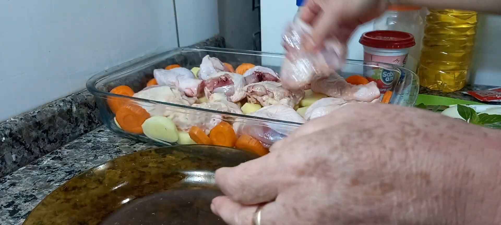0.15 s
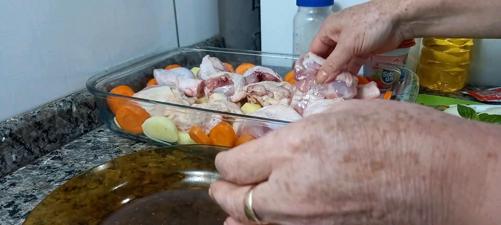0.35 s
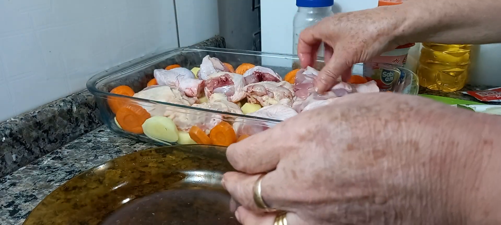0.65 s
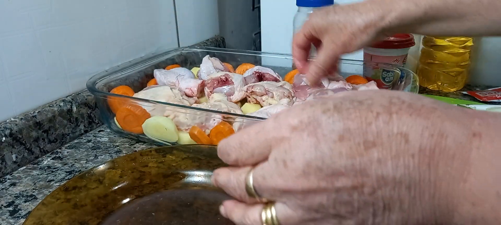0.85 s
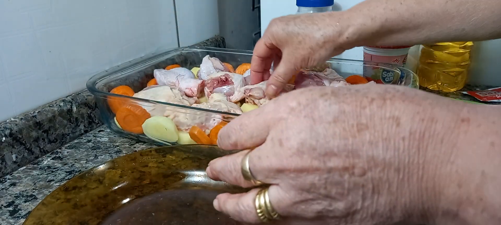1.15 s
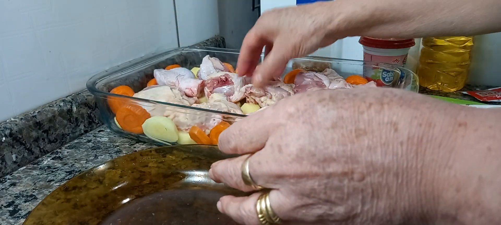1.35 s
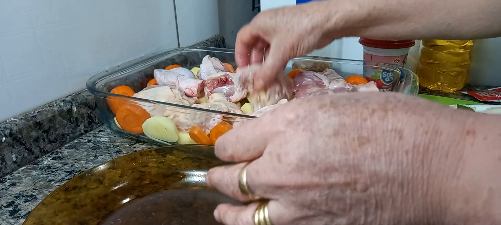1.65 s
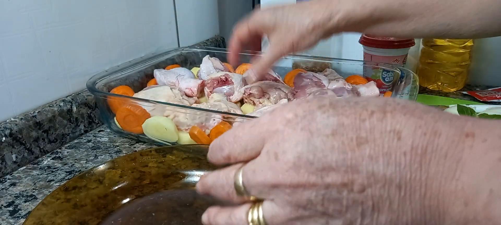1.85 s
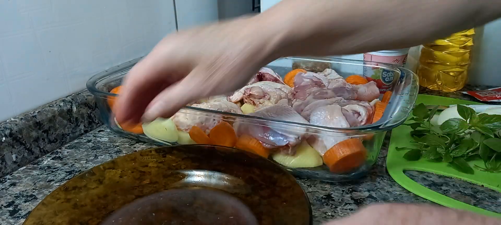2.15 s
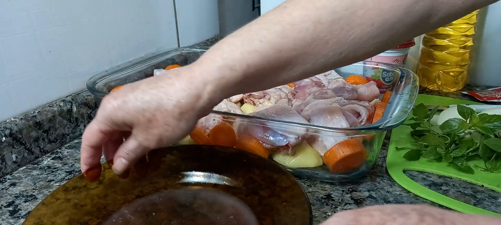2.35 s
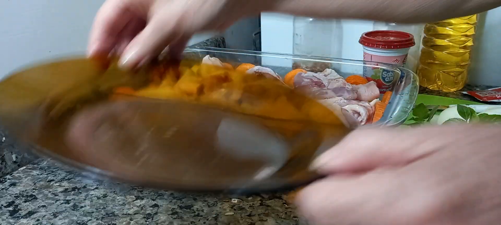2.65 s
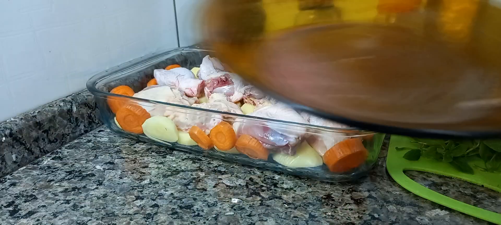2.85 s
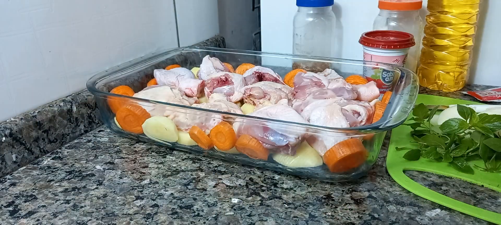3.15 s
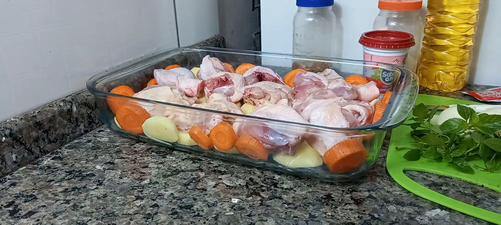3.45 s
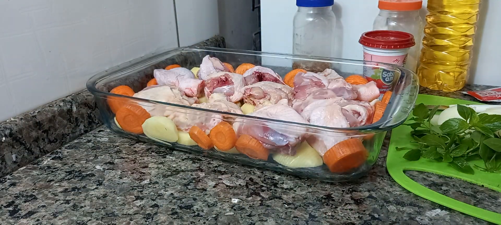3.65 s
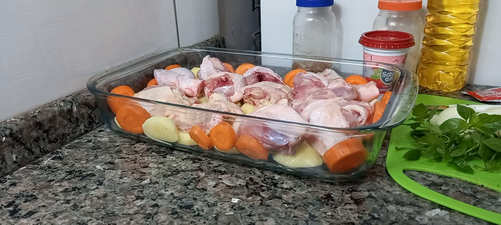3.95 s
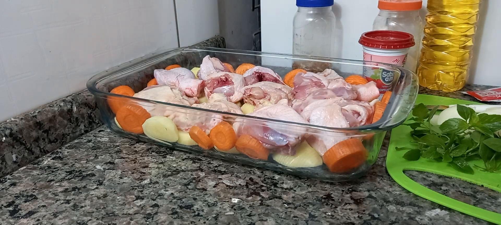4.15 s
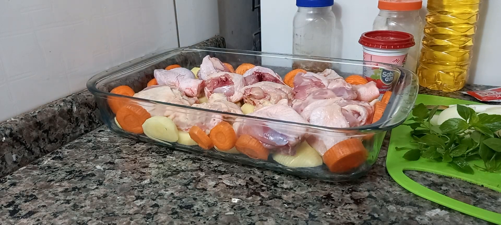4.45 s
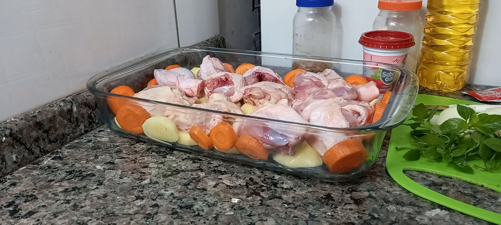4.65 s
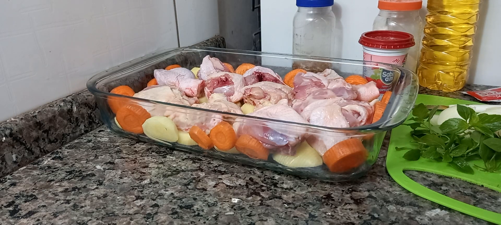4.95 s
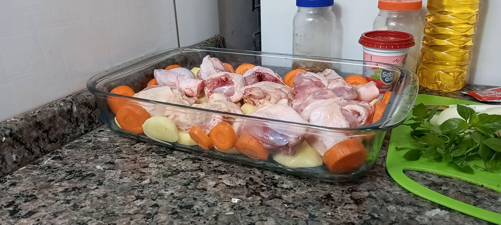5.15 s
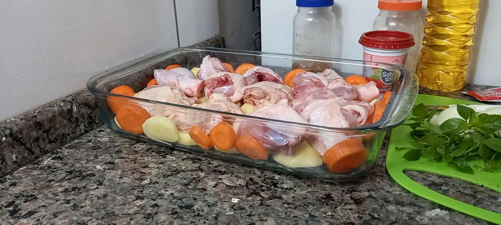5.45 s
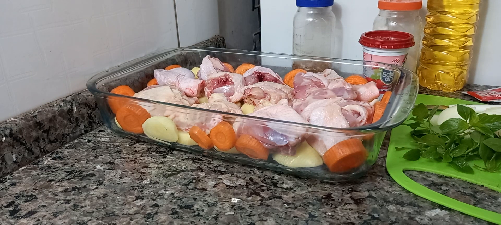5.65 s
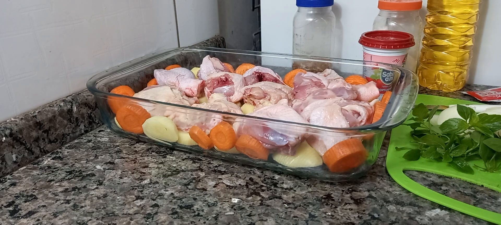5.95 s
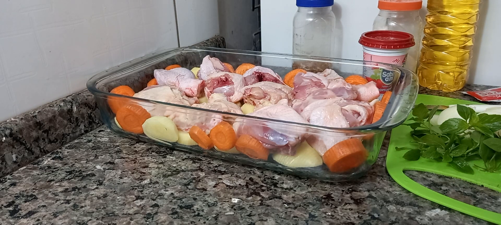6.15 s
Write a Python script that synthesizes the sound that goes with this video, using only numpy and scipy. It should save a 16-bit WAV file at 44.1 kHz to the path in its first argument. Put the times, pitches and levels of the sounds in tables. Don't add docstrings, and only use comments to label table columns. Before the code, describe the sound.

In a small kitchen, a dish knocks dully on the counter, a glass plate clatters loudly into a sink, then a tap sputters on.

```python
import sys
import numpy as np
from scipy import signal
from scipy.fft import rfft, irfft, next_fast_len
from scipy.io import wavfile
from scipy.ndimage import uniform_filter1d

SR = 44100
rng = np.random.default_rng(int(sys.argv[2]) if len(sys.argv) > 2 else 0)


def store_wav(level_fs):
    pcm = np.round(np.clip(np.atleast_2d(level_fs), -1, 1) * 32767)
    wavfile.write(sys.argv[1], SR, pcm.T.astype(np.int16))


def invert_db(x):
    u = np.asarray(x, float) / 20
    return 10 ** u


N = 278261


def coloured(points, size):
    hz, db = np.transpose(points)
    bins_hz = np.fft.rfftfreq(size, 1 / SR) + 1
    gain = invert_db(np.interp(np.log(bins_hz), np.log(hz), db))
    return unit(irfft(rfft(rng.standard_normal(size)) * gain, size))


def filtered(x, order, hz, kind):
    return signal.sosfilt(signal.butter(order, hz, kind, fs=SR, output="sos"), x)


def band(x, lo_hz, hi_hz):
    return filtered(x, 2, [lo_hz, min(hi_hz, .45 * SR)], "band")


def unit(x):
    return x / x.std()


def band_noise(size, lo_hz, hi_hz):
    return band(rng.standard_normal(size), lo_hz, hi_hz)


def walk(rate_hz):
    hold = int(SR / rate_hz)
    steps = np.repeat(rng.standard_normal(N // hold + 1), hold)
    return 1.3 * uniform_filter1d(uniform_filter1d(steps, hold), hold)[:N]


def columns(table):
    s, db, *rest = np.transpose(table)
    t = np.arange(N) / SR
    level_db = np.interp(t, s, db, left=-150, right=-150)
    return [level_db] + [np.interp(t, s, c) for c in rest]


def add(out, s, x, pan_db):
    i = int(s * SR)
    x = x[..., :N - i]
    out[:, i:i + x.shape[-1]] += x * invert_db(np.array([[pan_db], [-pan_db]]) / 2)


def pair(make, alike):
    share = np.clip(alike, 0, 1)
    mid = make() * np.sqrt(1 + share)
    side = filtered(make() * np.sqrt(1 - share), 1, 300, "high")
    return np.array([mid + side, mid - side]) / np.sqrt(2)


def blows(events, modes, crack, ring_s, crack_s, crack_db, scatter_db, rise_s):
    out, t = np.zeros((2, N)), np.arange(SR // 3) / SR
    hz, db, t60_s = np.transpose(modes)[:, :, None]
    beat_hz = .006 * hz * rng.random(hz.shape)
    beat = 1 + 0.7 * np.cos(2 * np.pi * beat_hz * t)
    lead = np.array([1, -1])[:, None, None] * np.clip(hz / 7000, 0, .6) * rng.standard_normal(hz.shape)
    for s, peak_db, bright_db, *pan_db in events:
        level_chance, pitch_chance = rng.standard_normal((2, len(modes), 1))
        decay = invert_db(db + scatter_db * level_chance - 60 * t / np.minimum(t60_s, ring_s))
        phase = 2 * np.pi * hz * (1 + 0.0024 * pitch_chance) * t + lead
        ring = np.sum(decay * np.sin(phase) * beat, axis=1)
        burst = invert_db(crack_db - 60 * t / crack_s) * pair(lambda: coloured(crack, len(t)), 0.1)
        x = ring / ring[:, :400].std() + burst
        low, high = filtered(x, 2, 3000, "low"), filtered(x, 2, 3000, "high")
        x = low / low[:, :400].std() - invert_db(bright_db) * high / high[:, :400].std()
        add(out, s, invert_db(peak_db) * x * np.clip(t / rise_s, 0, 1), sum(pan_db))
    return out


# f/Hz, t60/s
ROOM_T60 = [(200, 0.5), (1000, 0.42), (4000, 0.44), (12000, 0.3)]


def kitchen(dry, wet_db):
    t = np.arange(SR * 3 // 4) / SR
    hz, t60_s = np.transpose(ROOM_T60)
    tails = 0
    for f in 63 * 2. ** np.arange(9):
        octave = pair(lambda: band_noise(len(t), f / np.sqrt(2), f * np.sqrt(2)), 1 - f / 900)
        tails = tails + octave * invert_db(-60 * t / np.interp(np.log(f), np.log(hz), t60_s))
    tails = tails * np.clip(t / 0.0081, 0, 1)
    tails = tails / np.sqrt(np.sum(tails ** 2) / 2)
    return dry + invert_db(wet_db) * signal.fftconvolve(dry.mean(0, keepdims=True), tails, axes=1)[:, :N]


# f/Hz, level/dB per Hz
TONE = [(15, -39), (25, -43.5), (44, -15.5), (120, -11), (161, -14.5), (175, -11), (242, -5), (394, -16),
        (489, -22.5), (560, -28.5), (1330, -45.5), (1520, -49), (6740, -52.5), (7510, -60.5), (16000, -67)]
TONE_DB = -46
# f/Hz, width/Hz, level/dB
BOOM = [(64.94, 3.9, -63.5), (115.3, 25, -56.5), (244.7, 30.2, -47.5), (326, 64, -61.5), (486.3, 59, -67.5),
        (6500, 770, -73.5)]
# f/Hz, level/dB rms
HUM = [(59, -69), (188.4, -55)]
# f/Hz, width/Hz, level/dB rms
WHINES = [(5520, 60, -81), (8740, 50, -89.5), (13103, 60, -92)]
# t/s, level/dB
SWELL = [(0.0, -47.5), (0.37, -53), (0.86, -46), (1.9, -56.5), (2.2, -50), (4.09, -46.5), (4.24, -48.5),
         (4.88, -54.5), (5.45, -50.5), (5.68, -51), (6.17, -49), (6.31, -48.5)]


def room_tone():
    t = np.arange(N) / SR
    size = next_fast_len(N)
    mid = coloured(TONE, size)[:N]
    side = filtered(coloured(TONE, size)[:N], 2, 450, "high")
    out = invert_db(TONE_DB - 5.5) * np.array([mid + 0.7 * side, mid - 1.21 * side])
    swell_db = columns(SWELL)[0]
    for hz, width, db in BOOM:
        drive = np.exp(-np.log2(hz / BOOM[2][0]) ** 2)
        lift_db = (swell_db - swell_db.mean()) * drive + 2.58 * walk(3.315) * (hz < 1000)
        ring = pair(lambda: unit(band_noise(N, hz - width / 2, hz + width / 2)), 1 - hz / 900)
        out = out + invert_db(db + lift_db) * ring
    for hz, width, db in WHINES:
        rough = pair(lambda: unit(band_noise(N, hz - width / 2, hz + width / 2)), .3)
        out = out + invert_db(db) * (np.sin(2 * np.pi * hz * t) + .6 * rough)
    for hz, db in HUM:
        line = np.sqrt(2) * np.sin(2 * np.pi * hz * t + 0.17 * walk(26))
        out = out + invert_db(db + walk(11.0)) * line
    return out


# f/Hz, level/dB
SCUFF_COLOUR = [(290, -46), (500, 3.5), (561, -11.5), (726, -6), (1270, -9), (2260, -11), (3100, -13.5),
                (5200, -9.5), (6400, -2.5), (8120, -8.5), (12000, -20), (15500, -27)]
# loudest t/s, body level/dB, swell/s, fade/s, hiss over
# body/dB
SCUFFS = [(1.484, -69.5, 0.17, 0.067, 0), (2.615, -63, 0.077, 0.091, -8), (2.651, -53, 0.09, 0.13, -6.5),
          (2.7, -63.5, 0.13, 0.13, -5.5), (2.906, -60, 0.079, 0.32, -7.5), (3.036, -61, 0.026, 0.46, -7.5),
          (3.118, -56, 0.077, 0.094, -7), (3.884, -51.5, 0.03, 0.22, -6), (3.96, -61, .12, 0.28, -10),
          (3.85, -69.5, .1, .05, -21), (4.27, -70.5, 0.37, 0.11, -18.5), (5.075, -69, 0.52, 0.024, -14)]


def scuffs():
    rub = pair(lambda: coloured(SCUFF_COLOUR, N), 0.098) * invert_db(2.5 * walk(90) + 3 * walk(500))
    body, hiss = unit(band(rub, 500, 7500)), unit(band(rub, 6800, 16000))
    t, x = np.arange(N) / SR, 0
    for s, body_db, swell_s, fade_s, hiss_db in SCUFFS:
        slope_db = -30 * np.maximum((s - t) / swell_s, (t - s) / fade_s)
        x = x + invert_db(body_db + slope_db) * (body + invert_db(hiss_db) * hiss)
    return invert_db(3.0) * x


# t/s, peak level/dB, f/Hz, left minus
# right/dB
TICKS = [(.408, -68, 8640, 2), (1.099, -57.5, 2300, 13), (1.112, -54.5, 6070, 9), (1.341, -68, 3900, 11),
         (2.145, -76, 13000, 2), (4.99, -44, 400, -2), (4.998, -61, 6600, 2)]
# t/s, peak level/dB, f/Hz
DRIPS = [(5.429, -71, 8800), (5.54, -60, 6500), (5.584, -53.5, 6500), (5.619, -54, 6500),
         (5.636, -48.5, 6500), (5.715, -48, 6400), (5.728, -47.5, 4420), (5.795, -58, 2480),
         (5.824, -47, 2480), (5.86, -54, 2300), (5.892, -64, 2400), (5.933, -48, 2640), (6.018, -47, 4580),
         (6.04, -47, 3500), (6.193, -46, 3930), (6.246, -50, 5640), (6.266, -47.5, 2980)]
DRIP_PAN_DB = 17
TICK_S, TICK_CYCLES, TICK_HALF_BAND_RATIO = 0.043, 78, 1.08
CLICK_DB, CLICK_DB_PER_OCTAVE = -15, 2


def ticks():
    out, t = np.zeros((2, N)), np.arange(SR // 5) / SR
    drips = [(*row, DRIP_PAN_DB) for row in DRIPS]
    for s, peak_db, hz, pan_db in [*TICKS, *drips]:
        noise = rng.standard_normal(len(t))
        ring = unit(band(noise, hz / TICK_HALF_BAND_RATIO, hz * TICK_HALF_BAND_RATIO))
        ring = ring * invert_db(-60 * t / (TICK_S + TICK_CYCLES / hz)) * np.clip(t / 0.00056, 0, 1)
        click_db = CLICK_DB + CLICK_DB_PER_OCTAVE * np.log2(hz / 6000)
        click = band(noise, 2700, 15000) * invert_db(click_db - 60 * t / .012)
        add(out, s, invert_db(peak_db) * (ring + click), pan_db)
    return out



PATS = [(.06, -58.5, -10, 4), (1.485, -59.5, -7, 11), (1.795, -53.5, -31, -5), (2.06, -61, -11, 5),
        (3.033, -62.5, 7, -1), (3.882, -46.5, -20, -14.5)]
FLESH = [(916, 31, 0.022), (1250, -29, 0.047), (1530, -14, 0.053), (2190, -10, 0.027)]
FLESH_CRACK = [(290, -35), (500, -6), (592, 9), (1030, -4.5), (1250, -5), (1850, -10.5), (3590, -24),
               (6490, -11.5), (9000, -28), (11700, -69), (19800, -120)]


def meat_pats():
    return blows(PATS, FLESH, FLESH_CRACK, ring_s=.08, crack_s=0.095, crack_db=5.0,
                 scatter_db=-3.0, rise_s=0.012)


WOOD = [(410, -4.5, .1), (830, 3.5, 0.26), (1130, 2.5, 0.62), (1400, 10, 0.16), (2470, 0, 0.12),
        (1750, -2, 0.12), (2000, -5, .12), (2790, -8.5, 0.1), (3180, -9.5, .1), (3500, -19, .1)]
WOOD_S = .016
THUD = [
    (.621, -49, -23, -0.46),
    (.637, -57.5, -18, 0),
]
THUD_CRACK = [(290, -26), (500, -4), (687, 1.5), (1400, 2.5), (1930, -19), (2130, -36), (3500, -49.5),
              (4550, -67), (7700, -120)]


def meat_thud():
    return blows(THUD, WOOD, THUD_CRACK, ring_s=WOOD_S, crack_s=0.074, crack_db=14,
                 scatter_db=3, rise_s=0.003)


KNOCKS = [
    (.8455, -24.5, -24, -1),
    (.848, -34.5, -16, 9.5),
    (.851, -33.5, -26, -5),
    (.861, -31.5, -20, 2.5),
    (.868, -47.5, -23.5, 0),
]
WOOD_CRACK = [(120, -71), (200, 1), (800, 1), (1020, 6.5), (1410, 7.5), (1610, 5), (2400, -8.5),
              (3700, -18), (4200, -21), (6240, -17.5), (9000, -72), (11700, -100), (19800, -120)]


def worktop_knocks():
    return blows(KNOCKS, WOOD, WOOD_CRACK, ring_s=WOOD_S, crack_s=0.015, crack_db=8.0,
                 scatter_db=3, rise_s=0.00048)


GRIPS = [(2.172, -59.5, 2, 4.4), (2.197, -50.5, 0, 1.2), (2.212, -50.5, -30, 1.2), (2.222, -52, -24, 1.2),
         (2.235, -55.5, -0.5, 1.2), (2.262, -59, -20, 1.2)]
HELD = [(840, -2, .05), (1207, 1.5, 0.054), (1400, -4, 0.034), (1650, -5, 0.046), (2070, -20, .05),
        (2780, -26, 0.04), (4380, -8, 0.046), (5030, -6, .05), (5800, -6, .07), (6280, -4, 0.056),
        (6800, -3, .04)]
GRIP_CRACK = [(300, -26), (700, -0.5), (1500, 2), (2300, -9.5), (3400, -30), (4500, -15), (6400, -1),
              (7600, -23), (15000, -48)]


def plate_grips():
    return blows(GRIPS, HELD, GRIP_CRACK, ring_s=0.054, crack_s=0.077, crack_db=2.0,
                 scatter_db=4.5, rise_s=0.0051)


LIFTS = [(2.322, -51, -16, -1.4), (2.335, -53, -22, -2), (2.352, -56.5, -13, -2)]
TILTED = [(1110, -16, .06), (1535, 0, 0.033), (2026, -1.5, 0.031), (2300, -11, 0.026), (2740, -6, 0.042),
          (4750, -7, .025), (6400, -5, .03)]


def plate_lifts():
    return blows(LIFTS, TILTED, GRIP_CRACK, ring_s=.05, crack_s=0.063, crack_db=4.0,
                 scatter_db=3.0, rise_s=0.0013)


CLINK = [
    (2.398, -54, 0, 11.3),
]
RIM = [(1645, 0, 0.05), (2640, 4.5, 0.062), (3740, 7, .012), (4700, 8, 0.03), (5950, 15, 0.032),
       (6300, 16.5, 0.025), (7200, 10, 0.02), (11040, -10, 0.043)]
RIM_CRACK = [(710, -35), (1200, -13), (2340, -22), (2620, -26), (3700, -3.5), (5210, -5), (6170, -11),
             (7790, -12), (15000, -28)]


def rim_clink():
    return blows(CLINK, RIM, RIM_CRACK, ring_s=.045, crack_s=0.022, crack_db=2.0,
                 scatter_db=0.5, rise_s=0.00016)


# t/s, length/s, from f/Hz, to f/Hz, level/dB
GLIDES = [(2.886, 0.096, 1400, 1082, -59.5), (2.879, 0.12, 2940, 2610, -71), (3.029, .05, 1495, 1410, -65),
          (3.032, 0.14, 977, 1060, -63.5), (3.104, 0.024, 3010, 2930, -68), (5.0, 0.076, 830, 866, -61),
          (5.005, 0.11, 1625, 1660, -64), (5.009, .075, 1900, 1840, -66), (5.038, .055, 2640, 2650, -68),
          (4.987, 0.053, 5830, 5850, -65.5), (5.757, .18, 2730, 2058, -54), (5.917, 0.14, 2175, 1960, -64),
          (6.099, 0.24, 1775, 1410, -60.5)]
GLIDE_WIDTH = .045


def glides():
    out = np.zeros((2, N))
    for s, length_s, from_hz, to_hz, db in GLIDES:
        u = np.linspace(0, 1, int(length_s * SR))
        turn = np.exp(2j * np.pi * np.cumsum(from_hz + (to_hz - from_hz) * u) / SR)
        noise = rng.standard_normal((2, SR // 4)) + 1j * rng.standard_normal((2, SR // 4))
        slow = filtered(noise, 1, GLIDE_WIDTH * from_hz, "low")[:, -len(u):]
        mid, side = np.real(slow * turn)
        x = unit(np.array([mid + 1.1 * side, mid - 1.1 * side]))
        fade = np.clip(np.minimum(u / 0.2, (1 - u) / 0.4), 0, 1)
        add(out, s, invert_db(db) * x * fade, 0)
    return out


# t/s, spray level/dB, basin drumming over spray/dB
TAP = [(5.45, -74, -18), (5.57, -66.5, -23), (5.612, -69, -19), (5.625, -56.5, -20), (5.7, -57.5, -15),
       (5.755, -50.5, -16.5), (5.765, -48.5, -16.5), (5.82, -46, -31), (5.98, -49, -16.5),
       (6.142, -49.5, -11.5), (6.2, -42.5, -20), (6.225, -43, -16), (6.25, -40.5, -17), (6.31, -50, -6)]
# f/Hz, level/dB
SPRAY = [(530, -29), (900, -15), (1340, -15), (1470, -8), (1740, -10), (2210, 11.5), (3060, 2),
         (5000, -0.5), (6200, 4), (6740, 1), (8070, -8), (12300, -10), (15800, -18.5)]
SPLASH_DB = -13.5
DRY_HZ, FILM_HZ, WETTING_S, POOLS_S, DEEP_SHARE = 4500, 2100, .13, 6.07, .3


def tap():
    spray_db, drum_db = columns(TAP)
    mist = pair(lambda: coloured(SPRAY, N), 0.035)
    spray = unit(band(mist, 4060, 16500))
    drumming = pair(lambda: unit(band_noise(N, 290, 2000)), 0.15) * invert_db(spray_db + drum_db)
    bubbles, start_s = np.zeros((2, N)), TAP[0][0]
    for when, pitch, size, side, deep in rng.random((1300, 5)):
        s = start_s + when * (N / SR - start_s)
        low_hz = FILM_HZ + (DRY_HZ - FILM_HZ) * np.exp(-(s - start_s) / WETTING_S)
        if s > POOLS_S and deep < DEEP_SHARE:
            low_hz = low_hz / 2
        hz = low_hz * (5200 / low_hz) ** pitch ** 1.25
        cycles = np.arange(int(40 * SR / hz)) * hz / SR
        grain = np.sin(2 * np.pi * cycles * (1 + 0.0068 * cycles))
        grain = grain * np.exp(-cycles / 10.0) * np.clip(cycles, 0, 1)
        add(bubbles, s, grain * invert_db(-3.0 * np.log(1 - size)), 12 * (side - .5))
    bubbles = bubbles / bubbles[:, int(start_s * SR):].std()
    spray = spray * invert_db(spray_db + 2.7 * walk(40))
    return spray + bubbles * invert_db(spray_db + SPLASH_DB + 2 * walk(25)) + drumming


SETTLE = [(5.192, -25, -6.5), (5.199, -22, -6), (5.208, -26, -28), (5.221, -27, -10), (5.232, -30, -23),
          (5.245, -30.5, -28), (5.262, -39.5, -19)]
BASIN = [(89, -10.5, 0.3), (108, -9, .5), (144, -12, .3), (302, -3.5, 0.81), (407.4, 4.5, 0.33),
         (692, -8.5, 0.12), (897, -10, 0.083), (1205, -1, 0.082), (1627, -9.5, 0.062), (1462, -2.5, 0.07),
         (1770, -17, .1), (2153, -3.5, 0.14), (1945, 1, 0.058), (2238, 5, 0.11), (2660, 0, 0.1),
         (2690, 4, .05), (3300, -14, 0.13), (3550, -2, 0.075), (3620, -24, .1), (4430, -5.5, 0.08),
         (4800, -5, .05), (5200, -20, 0.08), (5760, -4.5, 0.08), (6440, -7, .05), (6700, -10, 0.055)]
BASIN_CRACK = [(55, -54), (95, 3.5), (343, -10.5), (413, -11.5), (705, -3), (773, -2.5), (931, -4),
               (2250, -7.5), (3190, -12.5), (3580, -10.5), (3930, -25), (6560, -11), (7600, -19),
               (12000, -32), (15500, -47)]


def basin_rattle():
    return blows(SETTLE, BASIN, BASIN_CRACK, ring_s=.13, crack_s=0.075, crack_db=3.5,
                 scatter_db=6.5, rise_s=0.00067)


SHIFT = [(5.0856, -26.5, -4, 3), (5.090, -25, -0.5, -1.5), (5.096, -21.5, -11, -0.5), (5.104, -32, -25, 7),
         (5.136, -26.5, -32, -1.5), (5.1737, -26.5, -13, -0.5), (5.179, -28.5, -3.5, -0.5)]
STACK = [(396, -15, 0.3), (508, -11.5, 0.04), (913, -1, 0.08), (1460, -5, 0.037), (1643, -3.5, 0.025),
         (1945, -2, 0.04), (2140, -21, 0.04), (2755, -8, 0.035), (3460, -11.5, 0.053), (4530, -13, 0.04),
         (4730, -27, 0.05), (5060, -24, .04), (5630, -25, 0.05), (6120, -16, 0.019), (6290, -6.5, 0.034),
         (6500, -7.5, 0.034), (6850, -21, 0.028), (9010, -36, 0.05), (9700, -26, 0.05), (11100, -29.5, .05)]
STACK_CRACK = [(210, -34.5), (350, -21), (520, -4.5), (639, -21.5), (892, -9), (1210, -20), (1910, -11),
               (2710, -15), (3120, -35), (3490, -21), (3840, -30), (6300, -22), (7200, -27), (8000, -28.5),
               (15500, -57)]


def stack_clatter():
    return blows(SHIFT, STACK, STACK_CRACK, ring_s=.055, crack_s=0.076, crack_db=-3.0,
                 scatter_db=1.0, rise_s=0.00054)


DROP = [(4.4696, -21, 5.5, 0.5), (4.479, -15.5, -2.5, 3), (4.4845, -22, -9, 0.5), (4.488, -20, -4.5, 3.5),
        (4.582, -27.5, -12, -6), (4.596, -29.5, -17, .6), (4.638, -39, -20, -1.5)]
PLATE = [(506, -12.5, 0.15), (710, -20, 0.11), (937, -0.5, 0.059), (1068, -11.5, 0.45), (1466, -11, 0.16),
         (1956, -1.5, 0.07), (2195, -17, 0.048), (2480, -11.5, 0.26), (2656, -10, .12), (2770, -7.5, 0.1),
         (2910, -17, 0.074), (3330, -4, 0.14), (3490, 0.5, 0.043), (3915, -17.5, 0.061),
         (4170, -18.5, 0.11), (4410, -19.5, .1), (4480, -6.5, 0.1), (5320, -18, .12), (5540, -5.5, 0.1),
         (5930, 0, 0.099), (5880, -2.5, 0.067), (5980, -30.5, 0.1), (6670, -20, 0.1), (7070, -11.5, .1),
         (6830, -9, 0.09)]
PLATE_CRACK = [(41, -61), (70, -28.5), (178, -24.5), (393, -1), (760, -12), (905, -3.5), (1330, -8.5),
               (1930, -8), (2290, -10), (3070, -13), (3450, -7), (3870, -11.5), (5280, -10.5), (5820, -3.5),
               (7000, -10), (7500, -25.5), (9360, -58.5), (15800, -120)]


def plate_drop():
    return blows(DROP, PLATE, PLATE_CRACK, ring_s=.125, crack_s=0.047, crack_db=3.5,
                 scatter_db=4.0, rise_s=0.00041)


TOUCHES = [
    (4.896, -59, 3.5, 6),
    (4.905, -52, -24, -8),
    (4.922, -57, -24, 0),
]
ROCKING = [(830, 3, 0.07), (1068, 5, 0.058), (1612, -2.5, 0.087), (1960, -7, .06), (2640, -9, 0.11),
           (3526, -4, .12), (4530, 0, 0.048), (5630, -2, .06), (5800, -8, .05)]


def plate_touches():
    return blows(TOUCHES, ROCKING, PLATE_CRACK, ring_s=.11, crack_s=0.04, crack_db=-4,
                 scatter_db=3.0, rise_s=0.0012)


GLINT = [(7300, -3.5, 0.22), (7795, -5, 0.27), (8320, 3, 0.16), (8400, -10, 0.17), (9050, -1.5, 0.25),
         (9157, -10.5, 0.2), (9500, -5, .22), (9950, -3.5, .22), (10720, -6.5, 0.25), (10830, -3.5, 0.15),
         (11430, -7, .2), (12100, -10.5, .2), (12180, -7, .2), (12760, -13, .2), (13000, -15, 0.27),
         (13300, -17.5, 0.18), (14640, -15.5, .18), (14800, -17.5, .15), (15210, -18, .16)]
GLINT_CRACK = [(6000, -39.5), (7300, -4.5), (13000, -5), (15800, -19)]


def plate_glint():
    hard = []
    for (s, peak_db, _, pan_db), less_db in [(DROP[0], 0), (SHIFT[1], -16)]:
        hard.append((s, peak_db - 34.0 + less_db, 24, pan_db))
    return blows(hard, GLINT, GLINT_CRACK, ring_s=0.24, crack_s=0.016, crack_db=-12,
                 scatter_db=-0.3, rise_s=.0006)


def scene():
    worktop = worktop_knocks() + meat_thud() + meat_pats() + plate_grips() + plate_lifts()
    sink = plate_drop() + plate_touches() + stack_clatter() + basin_rattle()
    noises = ticks() + scuffs() + tap() + glides()
    out = room_tone() + kitchen(noises, -4.0) + kitchen(worktop, -2.8)
    return out + kitchen(rim_clink(), -3.5) + kitchen(sink, -4.5) + kitchen(plate_glint(), -0.5)


def band_limit(x):
    return signal.sosfilt(signal.butter(12, 16500, fs=SR, output="sos"), x)


# f/Hz, level/dB
MIC = [(20, -17), (42, -14), (52, -1.5), (6950, 1), (7450, -3.5), (10000, 1.5), (15300, 10.5),
       (15750, -11.5), (15900, -59.5)]


def record(dry):
    size = next_fast_len(N + SR // 10)
    bins_hz = np.fft.rfftfreq(size, 1 / SR) + 1
    hz, db = np.transpose(MIC)
    gain = invert_db(np.interp(np.log(bins_hz), np.log(hz), db))
    lag = np.exp(-2j * np.pi * bins_hz * np.array([[4], [0]]) / SR)
    heard = irfft(rfft(np.tanh(dry), size) * gain * lag, size)[:, :N]
    return band_limit(heard)


dry = scene()
out = record(dry)
store_wav(out)
```